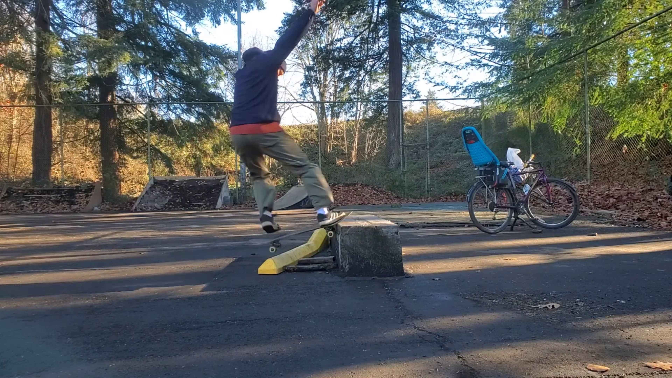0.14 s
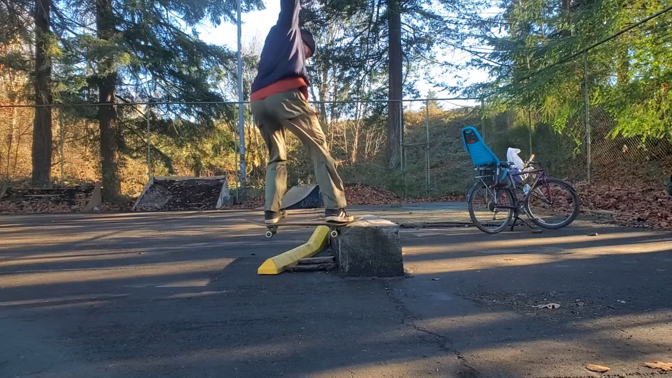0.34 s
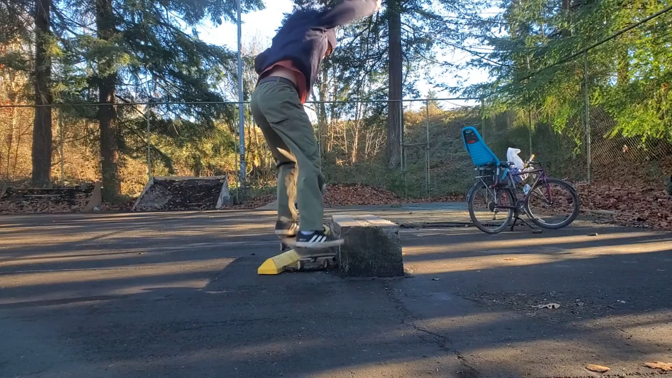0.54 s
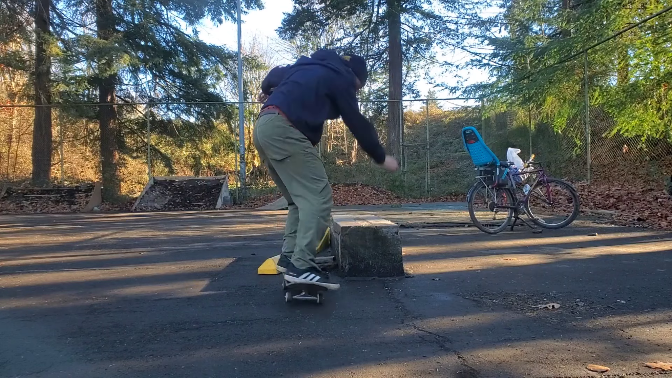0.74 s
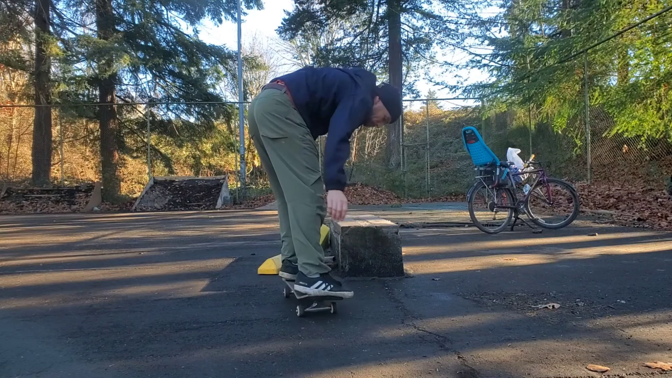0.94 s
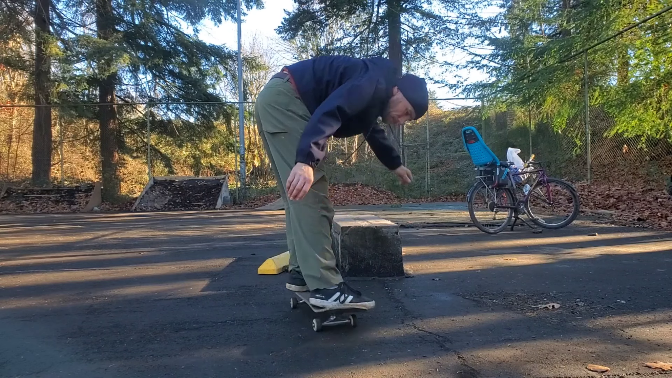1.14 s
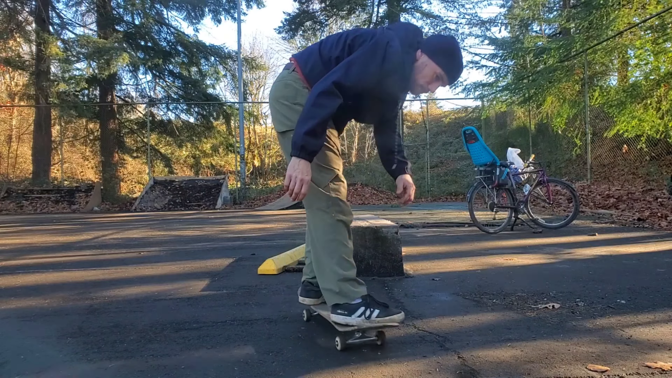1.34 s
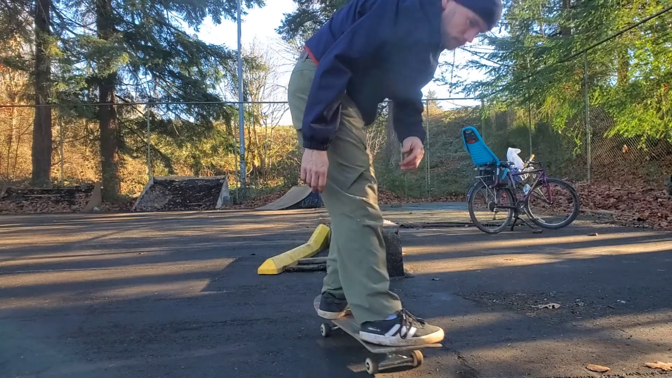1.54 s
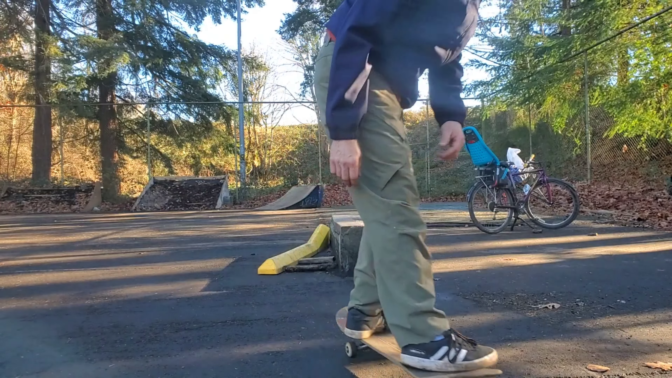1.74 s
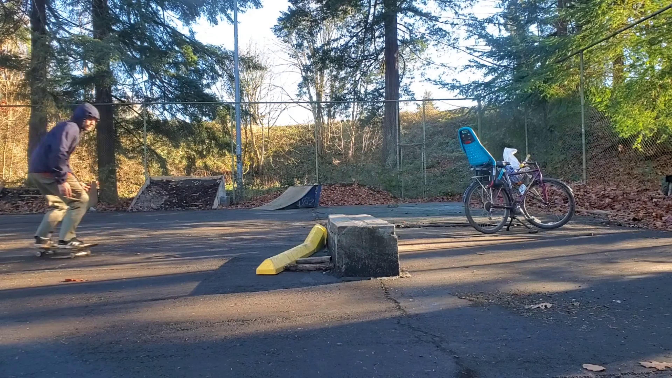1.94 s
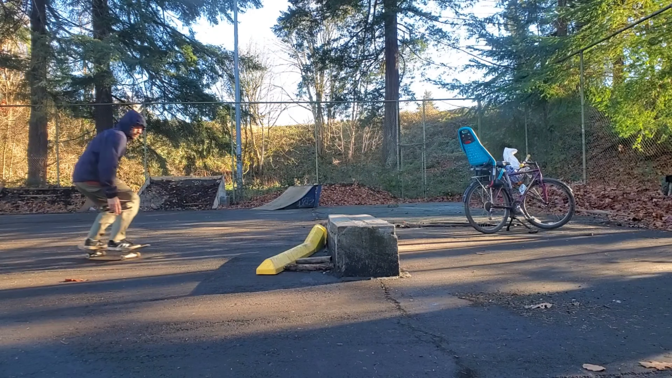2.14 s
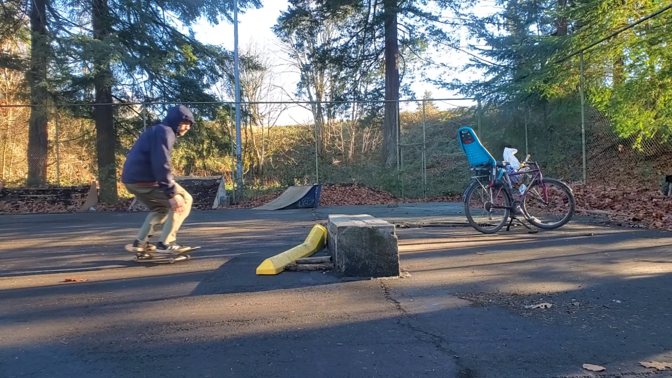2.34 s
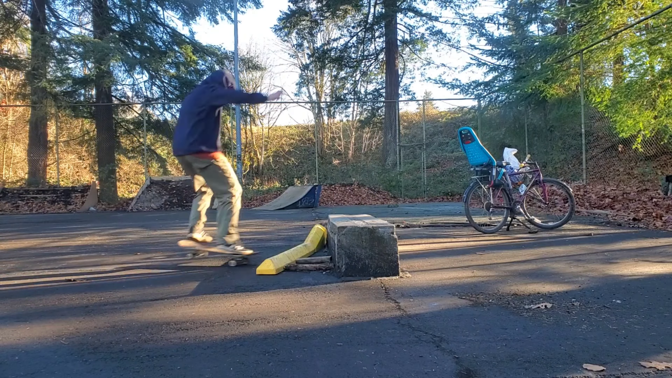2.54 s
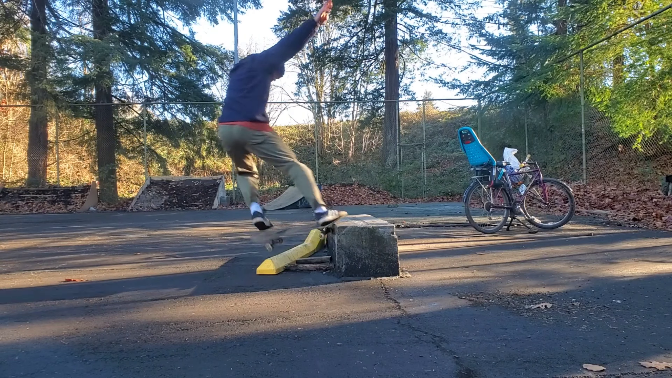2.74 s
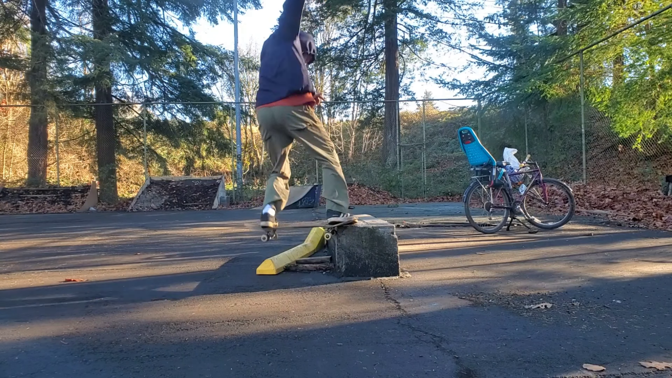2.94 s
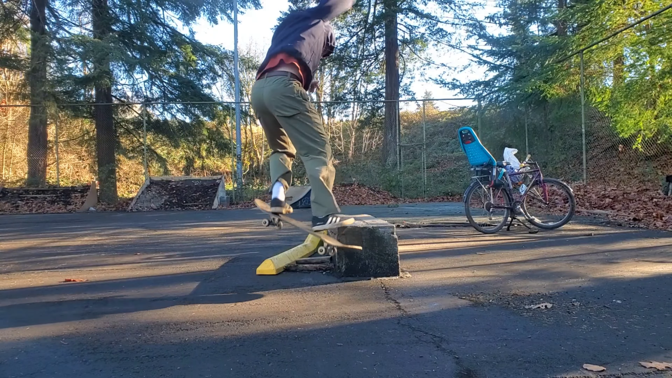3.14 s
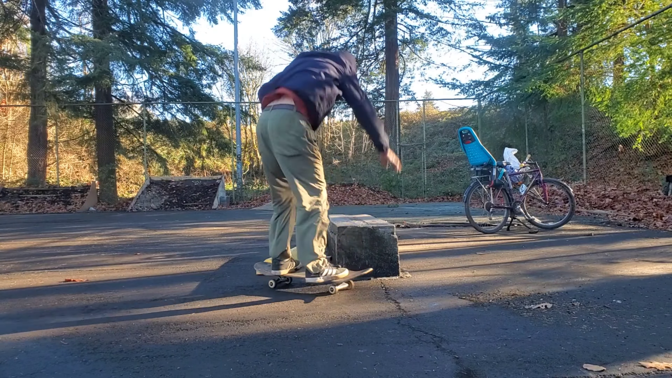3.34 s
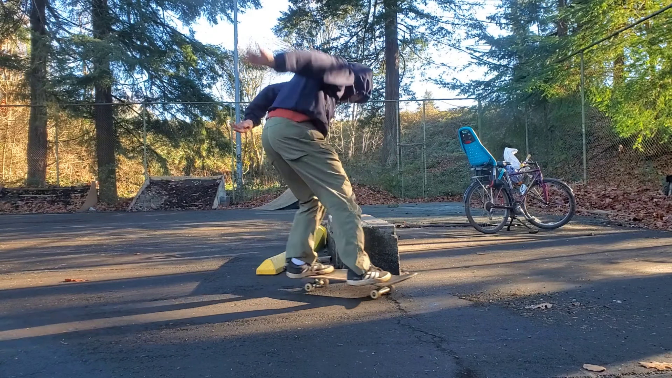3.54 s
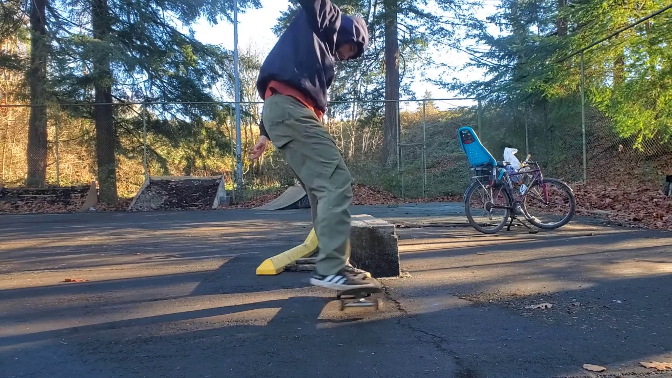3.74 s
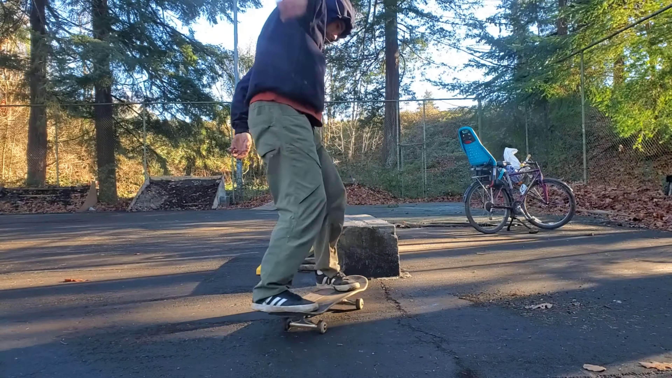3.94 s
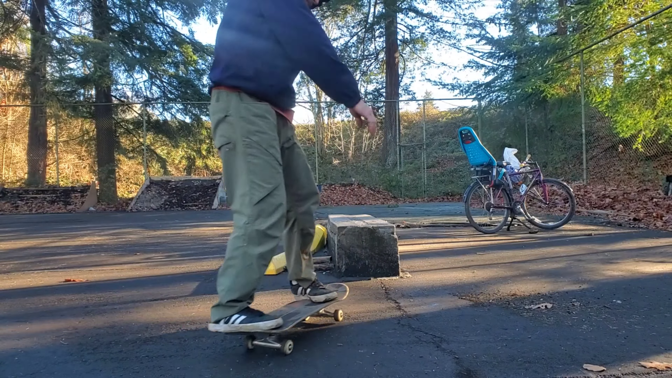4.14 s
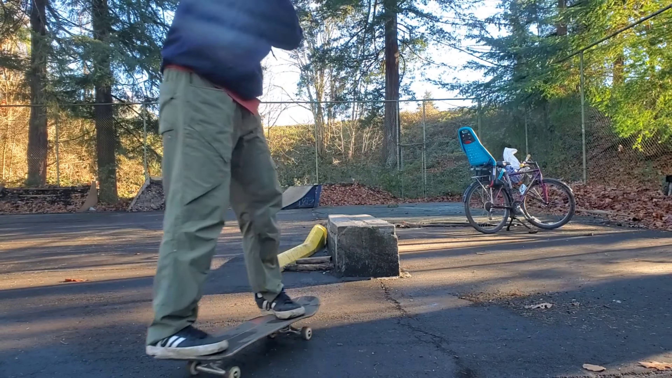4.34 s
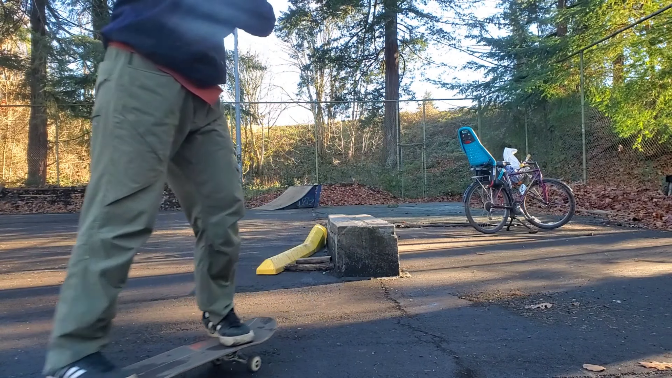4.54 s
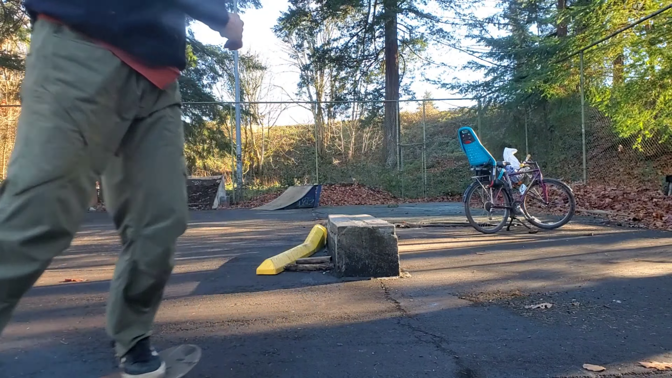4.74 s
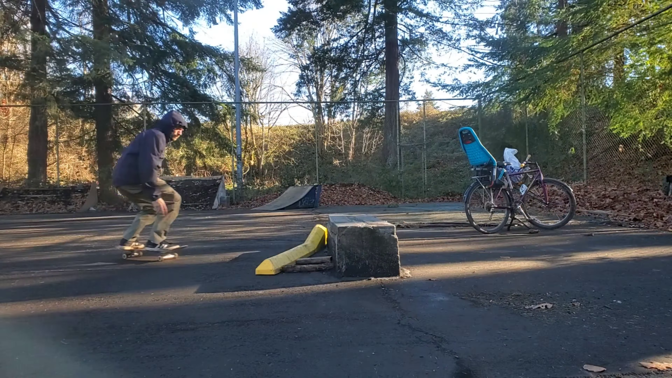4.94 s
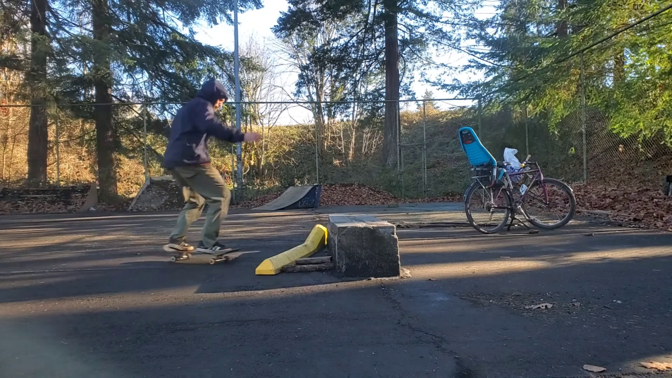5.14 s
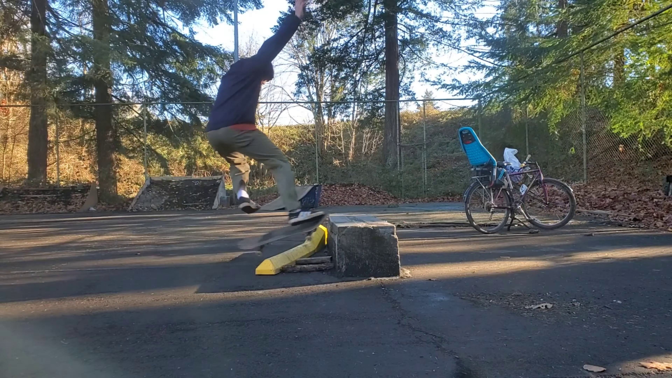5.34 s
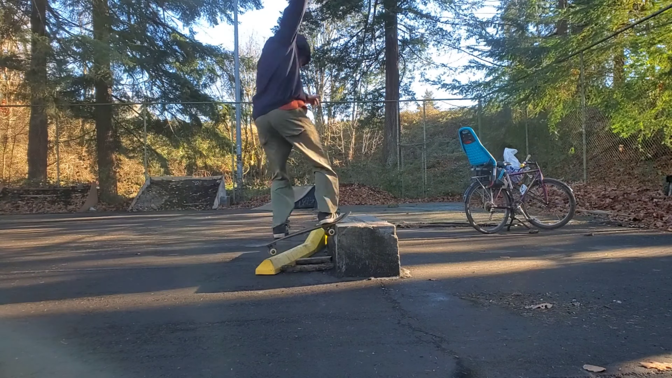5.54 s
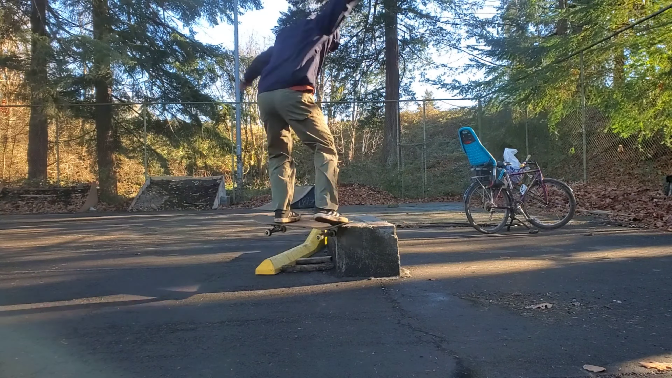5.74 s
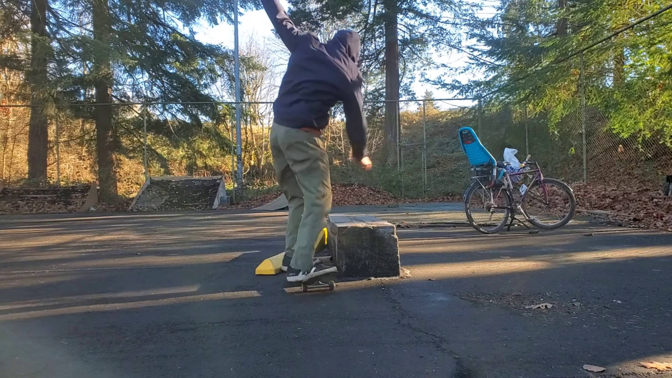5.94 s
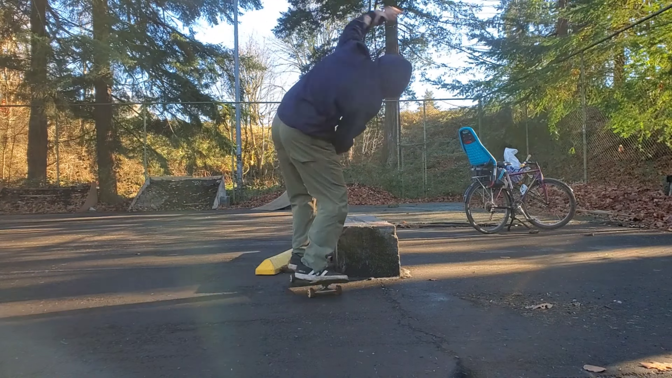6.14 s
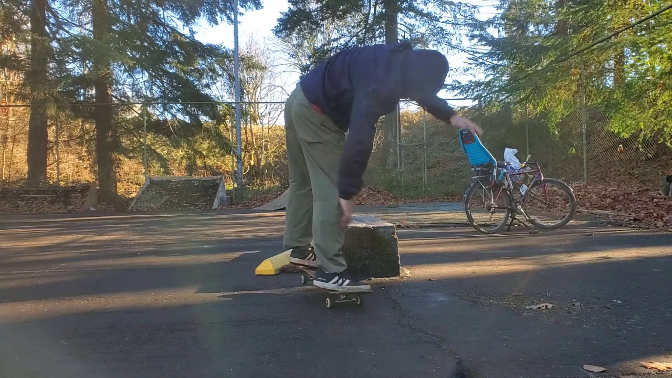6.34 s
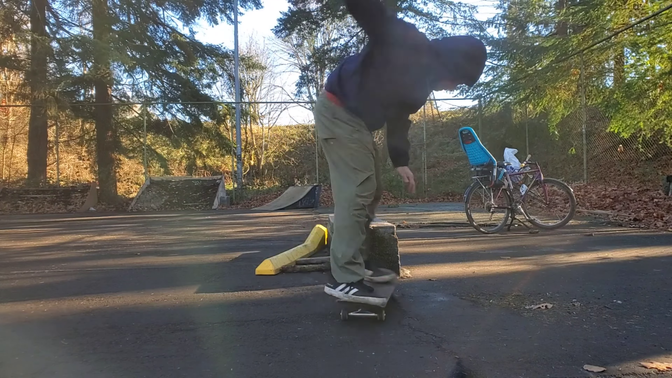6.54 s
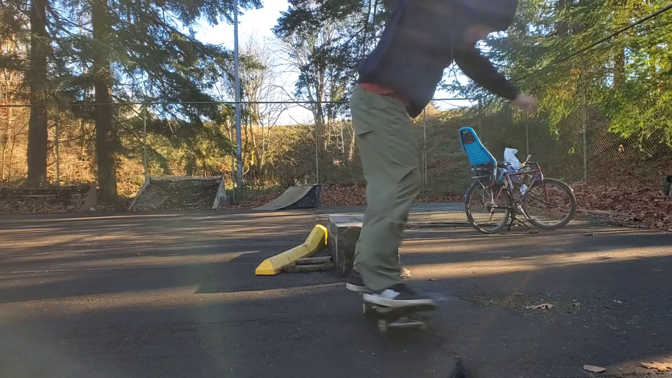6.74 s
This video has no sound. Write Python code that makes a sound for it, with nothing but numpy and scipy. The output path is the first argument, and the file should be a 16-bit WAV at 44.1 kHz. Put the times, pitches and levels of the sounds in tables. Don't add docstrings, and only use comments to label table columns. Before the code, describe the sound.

A stereo microphone stands in the open on rough asphalt, with low, uneven wind buffeting it and faint tree hiss. At 0 s a skateboard is already rattling into a concrete ledge: hard clacks and scrapes until 0.5 s, a brief hush, then a clattering landing at 0.75 s. It rolls on with grainy rumble, grit ticks and a sharp knock near 1.9 s. At 2 s the sound cuts to a louder rolling approach; dense cracks and scraping come at 2.6-3.1 s, a landing slap at 3.4 s, another clack at 3.9 s, then close gritty rolling with a thin bearing whine around 4.2-4.7 s. At 5 s another cut: strong rumble, scuffs and sharp knocks at 5.2-5.6 s, a short hop, a heavy landing at 6 s, quiet rolling, and a last double clack at 6.65 s before rolling out.

```python
import sys
import numpy as np
from scipy import signal
from scipy.fft import rfft, irfft
from scipy.io import wavfile
from scipy.ndimage import uniform_filter1d, map_coordinates

SR = 44100
rng = np.random.default_rng(int(sys.argv[2]) if len(sys.argv) > 2 else 0)


def boost(x):
    u = np.asarray(x, float) / 20
    return 10 ** u


def unload_audio(sound):
    columns = np.transpose(np.atleast_2d(sound))
    steps = np.round(np.clip(columns, -1, 1) * 32767)
    wavfile.write(sys.argv[1], SR, steps.astype(np.int16))


N = 303408


def rms_one(x):
    return x / np.sqrt(np.mean(x ** 2) + 1e-20)


def peak_one(rows):
    return rows / np.max(np.abs(rows), axis=-1, keepdims=True)


def in_time(rows):
    s, *columns = np.transpose(rows)
    return [np.interp(np.arange(N) / SR, s, c) for c in columns]


def together(*db):
    return 10 * np.log10(sum(boost(d) ** 2 for d in db))


def low_pass(x, order, hz):
    return signal.sosfilt(signal.butter(order, hz, fs=SR, output="sos"), x)


def colour(x, spectrum):
    hz, db = np.transpose(spectrum)
    grid = np.maximum(np.fft.rfftfreq(x.shape[-1], 1 / SR), 1)
    gain_db = np.interp(np.log(grid), np.log(hz), db, left=-90, right=-90)
    return irfft(rfft(x) * boost(gain_db), x.shape[-1])


def drift(rate):
    hop, warm_up = 40, 2000
    r = np.exp(-2 * np.pi * hop * rate / SR)
    noise = rng.standard_normal(N // hop + warm_up + 2)
    slow = signal.lfilter([1], [1, -2 * r, r * r], noise)[warm_up:]
    return np.interp(np.arange(N) / hop, np.arange(len(slow)), rms_one(slow))


def grains(shape, per_s, spread_db):
    sizes = boost(spread_db * np.minimum(rng.exponential(1, shape), 4))
    sizes = sizes * rng.choice([-1, 1], shape)
    return sizes * (rng.random(shape) < per_s / SR)


def port_noise(*shape):
    mid, side = rng.standard_normal((2, *shape))
    alike = 0.2
    ports = [np.sqrt(1 + alike) * mid + sign * np.sqrt(1 - alike) * side for sign in (1, -1)]
    return np.stack(ports, axis=-2)


def ring(clicks, modes, scatter_db, tilt_db=0):
    luck = rng.standard_normal((len(clicks), len(modes)))
    out = 0
    for k, (hz, level_db, t60) in enumerate(modes):
        r, w = boost(-60 / (t60 * SR)), 2 * np.pi * hz / SR
        sine = signal.lfilter([0, np.sin(w)], [1, -2 * r * np.cos(w), r * r], clicks + 1e-18)
        mode_db = level_db + scatter_db * luck[:, [k]] + tilt_db * np.log2(hz / modes[0][0])
        out = out + (-1) ** k * boost(mode_db) * sine
    return out


def add(track, times, rows):
    for s, row in zip(times, rows):
        at = round(s * SR)
        track[..., at:at + row.shape[-1]] += row[..., :N - at]


# t/s, deck rumble level/dB, truck looseness re rumble/dB
WHEELS = [
    [(0.0, -31.5, 0.5), (0.3, -41, -4.5), (0.55, -47.5, 0.5), (0.9, -45, -0.5), (1.37, -39.5, -13.5),
     (1.63, -43, -12), (2.0, -41, -14)],
    [(2.002, -30.5, -6.5), (2.6, -31.5, -12.5), (2.87, -39.5, -10), (3.14, -49, -14), (3.86, -42.5, -1.5),
     (4.02, -49.5, -7), (4.5, -41, -9), (4.82, -36, -17.5), (5.0, -50, 1)],
    [(5.003, -28.5, -9), (5.29, -34, -4), (5.6, -43, -6.5), (6.5, -52, -10), (6.61, -39.5, -9),
     (6.78, -46, -1.5), (6.88, -46, -14)],
]
# lift t/s, landing t/s
FLIGHTS = [
    (0.56, 0.73),
    (3.14, 3.3),
    (5.87, 5.985),
]
# start t/s, length/s, scrape level/dB
GRINDS = [(0.0, 0.035, -37), (0.091, 0.12, -37.5), (0.227, 0.098, -39), (0.33, 0.12, -49.5),
          (0.45, 0.089, -46), (2.0, 0.11, -44), (2.712, 0.065, -35), (2.87, 0.26, -45.5), (3.5, 0.09, -55),
          (4.28, 0.39, -53), (4.7, 0.18, -54), (4.942, 0.042, -50), (5.243, 0.047, -42),
          (5.34, 0.12, -41.5), (5.497, 0.075, -46), (5.683, 0.16, -49.5), (6.758, 0.037, -53),
          (3.8, 0.11, -60), (6.57, 0.055, -58.5), (6.648, 0.03, -49)]


def effort():
    t = np.arange(N) / SR
    rumble_db, loose_db = in_time(np.concatenate(WHEELS))
    fade_db_per_s, attack_s, grind_fade_db_per_s = 83, 0.023, 280
    hush_db = sum(fade_db_per_s * (t - lift) * ((t > lift) & (t < land)) for lift, land in FLIGHTS)
    step = t[::40]
    levels = []
    for s, length, db in GRINDS:
        rise_db = 20 * np.log10(np.clip((step - s) / attack_s, 1e-4, 1))
        levels.append(db + rise_db - grind_fade_db_per_s * np.maximum(step - s - length, 0))
    grind_db = np.interp(t, step, together(*levels))
    trucks_db = rumble_db + loose_db
    clumps_db = 1.8 * drift(14)
    grit_db = -59.5 + 0.18 * (trucks_db + 49)
    trucks_sum = together(trucks_db, grind_db - 3) + clumps_db
    scrape_sum = together(grit_db - 3.5, grind_db) + clumps_db
    grit_sum = together(grit_db, grind_db - 10)
    return rumble_db - hush_db, trucks_sum - hush_db, scrape_sum - hush_db, grit_sum - hush_db


# f/Hz, level/dB, T60/s
DECK = [(174, -3.5, 0.058), (262, 5.5, 0.02), (315.7, 1, 0.1), (366, 0, 0.021), (509.5, -2, 0.044)]
# f/Hz, level/dB, T60/s
AXLES = [(562.5, -3.5, 0.031), (739, 2.5, 0.031), (928, 2, 0.02), (1120, 2, 0.022)]
# f/Hz, level/dB, T60/s
EDGE = [(1384, -2, 0.031), (1598, -1, 0.023), (1969, 2.5, 0.014), (2325, -2.5, 0.021), (2637, -3, 0.014),
        (3006, -3.5, 0.014), (3380, -6, 0.0082)]
# f/Hz, level per Hz/dB
RUMBLE = [(71, -34), (120, -7), (201, -6.5), (399, -4.5), (603, -8), (756, -15), (1150, -38), (1400, -17.5),
          (1820, -64), (3080, -120)]
# f/Hz, level per Hz/dB
TRUCKS = [(500, -19), (800, 0.5), (1000, 2.5), (1250, -2), (1500, -3), (1900, -4.5), (2800, -20)]
# f/Hz, level per Hz/dB
SCRAPE = [(760, -45), (1300, -8.5), (2300, -4.5), (3040, -5), (3830, -10), (4040, -13), (6000, -21),
          (7800, -49), (13200, -120)]
# t/s, level/dB
WHINE = [(4.2, -80), (4.24, -48), (4.34, -50), (4.66, -54), (4.76, -62), (4.8, -80)]
# f/Hz, level per Hz/dB
BEARING = [(820, -40), (930, -2), (1010, 0), (1130, -40)]


def rolling(rumble_db, trucks_db, scrape_db, lumps):
    stones = grains((1, N), per_s=900, spread_db=-0.5)
    deck = rms_one(colour(stones[0], RUMBLE)) + .4 * rms_one(ring(stones, DECK, scatter_db=0)[0])
    sharp = grains(N, per_s=1500, spread_db=3.0)
    streaks = .4 * rms_one(ring(sharp[None], AXLES + EDGE[:4], scatter_db=0)[0])
    trucks = rms_one(colour(sharp + stones[0], TRUCKS)) + streaks
    patch_db = 2.5
    under = low_pass(trucks, 2, 1150)
    over = trucks - under
    trucks = under * boost(patch_db * lumps[::-1]) + over * boost(patch_db * np.roll(lumps, N // 3))
    upper = boost(trucks_db) * rms_one(trucks)
    upper = upper + boost(scrape_db) * rms_one(colour(sharp, SCRAPE))
    upper = upper + boost(*in_time(WHINE)) * rms_one(colour(sharp, BEARING))
    return boost(1.5 * lumps) * (boost(rumble_db) * rms_one(deck) + upper)


# f/Hz, level per Hz/dB
GRIT = [(1760, -35), (3000, -3), (3880, 4), (6440, 9), (7800, 2.5), (9460, 7), (11400, 8), (15400, 6.5),
        (16500, -20)]


def grit(grit_db, lumps):
    crunch = signal.lfilter([1], [1, -.988], np.abs(grains(N, per_s=70, spread_db=2.5)))
    hiss = colour(port_noise(N) * (1 + 1.34 * crunch), GRIT)
    return boost(grit_db - 1 + 0.59 * lumps) * rms_one(hiss)


# t/s, level/dB
GUSTS = [
    [(0.0, -27.5), (0.31, -33), (0.342, -25.5), (0.554, -38.5), (0.592, -33), (1.674, -38.5), (1.706, -37),
     (1.95, -30), (1.99, -33.5)],
    [(2.0, -46), (3.1, -43), (3.26, -53), (3.44, -37.5), (3.55, -49), (4.3, -39), (4.46, -43), (4.92, -43),
     (4.99, -34)],
    [(5.0, -37.5), (5.302, -31.5), (5.402, -55), (5.502, -33), (5.848, -47.5), (6.004, -37), (6.398, -46),
     (6.424, -33), (6.88, -35)],
]
# f/Hz, level per Hz/dB
WIND = [(12, -49), (20, -49), (43, -0.5), (76, 3.5), (92, -0.5), (140, -4), (331, -18.5), (400, -46),
        (520, -41), (880, -120)]
# t/s, level/dB
DEEP_WIND = [(0, 2), (1.4, 1), (1.99, 5), (2.0, 4), (2.4, 0), (2.6, -6), (4.99, -3), (5.0, -2), (6.88, -5)]


def wind():
    wind_db, = in_time(np.concatenate(GUSTS))
    gusts = colour(rng.standard_normal((3, N)), WIND)
    ports = [(gusts[k] + .45 * gusts[2]) * boost(3.5 * drift(9)) for k in range(2)]
    deep = low_pass(ports, 2, 60)
    return boost(wind_db + 5.5) * rms_one(ports + (boost(*in_time(DEEP_WIND)) - 1) * deep)


def air():
    spectrum = [(100, -14), (1000, 3.5), (4000, -17), (16000, -52)]      # f/Hz, level per Hz/dB
    return boost(-52.5) * rms_one(colour(rng.standard_normal((2, N)), spectrum))


def blows(table, first, rise_s, abrupt, per_s, soft_hz):
    s, edge_db, plank_db, axle_db, treble_db, length = np.transpose(table)[:, :, None]
    t = np.arange(4608) / SR
    length = np.clip(length, .001, .04)
    pressure = np.exp(-(t / length) ** abrupt) * np.minimum(t / rise_s, 1)
    chatter = grains((len(s), len(t)), per_s, spread_db=4.0) * pressure + first * (t == t[30])
    force = low_pass(chatter, 1, soft_hz)
    soles = np.exp(-np.maximum(t - 1.06 * length, 0) / 0.011)
    tilt_db = -.3 * (plank_db + 12) - .3 * (axle_db + 7)
    edge = peak_one(ring(force, EDGE, scatter_db=2.5, tilt_db=tilt_db)) * soles
    axles = peak_one(ring(force, AXLES, scatter_db=3.0)) * soles
    plank = peak_one(ring(force, DECK, scatter_db=2.0)) * soles
    shake = uniform_filter1d(np.abs(chatter), size=40)
    crack = 0.38 * first * np.exp(-t / 0.00099)
    burst = 0.54 * pressure + 2.8 * shake + crack
    spit = peak_one(port_noise(len(s), len(t)) * burst[:, None])
    body, treble = np.zeros(N), np.zeros((2, N))
    mix = edge + boost(axle_db + 2.5) * axles + boost(plank_db + 5.0) * plank
    add(body, s[:, 0] - .001, boost(edge_db) * mix)
    add(treble, s[:, 0] - .0003, boost(edge_db + treble_db + 18)[:, None] * spit)
    return body, treble


def contacts(s, edge_db, plank_db, treble_db, length, axle_db):
    axle_db = axle_db + 0.32 * (plank_db + 10)
    return np.transpose(np.broadcast_arrays(s, edge_db, plank_db, axle_db, treble_db, length))


# t/s, edge peak level/dB, plank re edge/dB, treble re edge/dB, length/s
SCUFFS = [(0.0034, -14.5, -2, -30, 0.022), (0.041, -29, -11, -22, 0.01), (0.508, -19, -17, -15.5, 0.024),
          (0.812, -28.5, 0.5, -17, 0.03), (2.59, -22.5, 1.5, -26, 0.049), (2.6264, -19, -3.5, -23, 0.034),
          (2.6406, -16, -9, -24, 0.041), (3.538, -31, -6.5, -11.5, 0.034), (3.8284, -29.5, -8, -22, 0.038),
          (3.8662, -28, -18, -28, 0.041), (5.226, -19.5, 1, -28, 0.04), (5.257, -14.5, -2.5, -24, 0.03),
          (5.2847, -18.5, -11, -28, 0.025), (5.822, -13.5, -16.5, -17.5, 0.033),
          (5.841, -29.5, -2, -11, 0.016), (2.832, -11, -20, -17, 0.015), (3.024, -17, -30, -15, 0.019),
          (5.302, -26, -14, -20, 0.014)]


def scuffs():
    rows = contacts(*np.transpose(SCUFFS), axle_db=-5.0)
    return blows(rows, first=0, rise_s=0.021, abrupt=2.7, per_s=2500, soft_hz=3500)


# t/s, edge peak level/dB, plank re edge/dB, treble re edge/dB, axles re edge/dB
SLAMS = [(0.0126, -21, 0, -22, -3), (0.0236, -11.5, -16, -23, -3), (0.2216, -6, -11, -12.5, -5),
         (0.2325, -7.5, -19, -15, -5), (0.2882, -16, -9.5, -14.5, -4.5), (0.7417, -8.5, -8.5, -18.5, -3.5),
         (0.7512, -19, -3.5, -14, -3), (2.7363, -12, -13, -21, -2), (2.8461, -3, -23, -15.5, -6),
         (3.372, -17.5, -14, -18.5, -8), (3.0601, -21.5, -18, -17.5, -9), (3.3548, -15, -12.5, -16.5, -6),
         (3.3884, -5.5, -7, -18.5, -5), (3.4009, -10.5, -8, -17, -2), (3.9412, -16, -12, -15.5, -5),
         (5.476, -6, -12, -12, -8), (5.4859, -9, -7, -15, -4.5), (5.9845, -10, -7, -12.5, -3),
         (6.0037, -5.5, -8.5, -19.5, -3.5), (6.641, -15, -10, -22, -10), (6.6529, -14, -9, -18, -6)]


def slams():
    s, edge_db, plank_db, treble_db, axle_db = np.transpose(SLAMS)
    length = 0.016 - 0.0004 * (edge_db + 8)
    rows = np.transpose([s, edge_db, plank_db, axle_db, treble_db, length])
    return blows(rows, first=4.0, rise_s=.0006, abrupt=3.5, per_s=1100, soft_hz=2500)


# t/s, edge peak level/dB, plank re edge/dB, treble re edge/dB, length/s
KNOCKS = [(0.0864, -5, -13, -19.5, 0.008), (0.7684, -9.5, -7.5, -18.5, 0.0095),
          (1.8929, -16, -13, -20, 0.003), (2.699, -3, -20, -20, 0.0097), (2.819, -4, -15, -12.5, 0.011),
          (2.8655, -5.5, -20, -20.5, 0.011), (2.9178, -22, -28, -17, 0.007), (3.4187, -11, -8, -13, 0.0031),
          (3.6489, -26.5, -11, -19, 0.022), (3.9132, -12.5, -17, -9.5, 0.0058),
          (4.28, -22.5, -8, -19, 0.007), (4.3024, -25.5, -8, -22, 0.016), (4.858, -22.5, -19, -17, 0.009),
          (4.9307, -18, -15, -26, 0.0067), (4.9756, -25, -11, -11.5, 0.007),
          (5.3369, -3, -19.5, -22.5, 0.01), (5.4994, -18.5, -3.5, -9, 0.005),
          (5.5424, -6.5, -22.5, -21, 0.005), (5.5643, -13.5, -18, -14.5, 0.0086),
          (5.6032, -21, -13.5, -14, 0.006), (5.7157, -26, -4.5, -11.5, 0.0047),
          (6.0278, -10.5, -7, -22, 0.0076), (3.4135, -22, 6, -22, 0.0035), (3.8484, -25, -11, -16, 0.0037),
          (2.796, -22, -18, -17, 0.0054)]
# t/s, edge peak level/dB, plank re edge/dB
TAPS = [(0.9083, -27.5, -11), (0.9898, -31, -3), (1.3455, -39, 8.5), (1.7298, -32, 9), (1.872, -28.5, -13),
        (2.0023, -30, -11), (2.1156, -21.5, -5), (3.277, -42, -8), (3.4674, -42, 15.5), (3.5922, -36, 5),
        (4.0353, -60, 18.5), (4.111, -38, -10), (4.2381, -33, -6), (4.4008, -26.5, -26), (4.5893, -25, -24),
        (4.648, -26, -9), (4.8817, -29, -5), (5.3094, -39, -7), (5.5782, -26, -3), (5.7473, -27.5, -28),
        (5.7965, -29.5, -1.5), (6.0845, -28.5, -6), (6.784, -23.5, -8.5)]


def knocks():
    hard = contacts(*np.transpose(KNOCKS), axle_db=-9)
    light = contacts(*np.transpose(TAPS), treble_db=-18.5, length=0.005, axle_db=-8)
    rows = np.r_[hard, light]
    return blows(rows, first=5.1, rise_s=0.0011, abrupt=0.71, per_s=1800, soft_hz=9000)


# f/Hz, level per Hz/dB
BRIGHT = [(1760, -22), (3000, 2.5), (5120, -2), (5620, -0.5), (8090, -12), (8930, -9), (14800, -12),
          (15800, -24), (16500, -50)]


def impacts():
    bodies, trebles = zip(scuffs(), slams(), knocks())
    return sum(bodies), colour(sum(trebles), BRIGHT)


def pings(table, cycles):
    s, peak_db, hz = np.transpose(table)[:, :, None]
    turns = hz * np.arange(4096) / SR
    modes = [(1, 1), (.81, -.55), (1.23, .35)]
    rows = sum(share * np.sin(2 * np.pi * ratio * turns) for ratio, share in modes)
    rows = rows * np.minimum(turns, 1) * boost(-60 * turns / cycles)
    track = np.zeros(N)
    add(track, s[:, 0], boost(peak_db) * peak_one(rows))
    return track


# t/s, peak level/dB, f/Hz
STRIKES = [(3.9145, -16, 1080), (6.029, -13, 900), (5.986, -15, 2800), (3.358, -22, 3000),
           (0.0872, -9, 3200), (0.121, -25, 3300), (0.2265, -9, 750), (0.2305, -12, 2300),
           (0.7432, -10, 1650), (0.7698, -13, 1600), (1.8935, -22, 2700), (2.7, -12, 3000),
           (2.8485, -10, 2800), (2.8675, -10, 2300), (3.035, -22, 2100), (3.054, -26, 2400),
           (3.069, -24, 2400), (3.3895, -10, 1370), (3.4035, -9, 520), (3.914, -18, 6500),
           (5.338, -9, 2700), (5.479, -12, 2000), (6.005, -11, 1700), (6.009, -9, 1150), (6.6415, -8, 1900),
           (6.654, -10, 1900), (6.658, -14, 1300)]


def strikes():
    return pings(STRIKES, cycles=22.0)


# t/s, peak level/dB, f/Hz
THUMPS = [(0.15, -21, 70), (0.893, -25, 89), (1.732, -27, 250), (4.036, -20, 190), (6.643, -16, 280),
          (3.357, -22, 280), (2.701, -16, 560), (4.95, -30, 500), (3.848, -29, 94), (4.291, -24, 94),
          (4.384, -31, 73), (5.81, -32, 75), (6.236, -33, 62), (6.305, -32, 81), (0.822, -24, 330),
          (1.35, -28, 330)]


def thumps():
    return pings(THUMPS, cycles=7.0)


def snapping(table, spectrum, gain_db):
    s, peak_db = np.transpose(table)
    snap = port_noise(len(s), 768) * np.exp(-np.arange(768) / SR / 0.0013)
    track = np.zeros((2, N))
    add(track, s, boost(peak_db + gain_db)[:, None, None] * peak_one(snap))
    return colour(track, spectrum)


# t/s, peak level/dB
TICKS = [(0.274, -32), (0.3034, -39), (0.8038, -37), (0.825, -39.5), (1.063, -49), (1.1543, -49),
         (1.172, -45), (1.2333, -51), (1.306, -36), (1.872, -39.5), (1.789, -52), (1.8116, -48),
         (1.8344, -51), (1.946, -41.5), (1.9834, -46), (3.698, -48), (3.817, -48.5), (4.132, -46.5),
         (4.1804, -51.5), (4.213, -47), (4.263, -45), (4.6297, -44), (4.7294, -40.5), (4.7643, -42),
         (5.5309, -37), (6.214, -53), (6.2722, -49), (6.4677, -53), (6.576, -52), (6.714, -44),
         (1.2837, -55), (4.1647, -55), (4.6052, -54), (4.7135, -54), (5.9995, -33), (6.5577, -56),
         (0.8142, -42), (3.633, -53)]


def ticks():
    return snapping(TICKS, GRIT, gain_db=10.5)


# t/s, peak level/dB
BUMPS = [(0.333, -18), (0.606, -17), (1.069, -21), (1.702, -21), (1.835, -22), (1.903, -23), (2.612, -25),
         (3.383, -23), (4.029, -23.5), (4.097, -23), (4.962, -20.5), (5.163, -20), (5.258, -13),
         (5.474, -19.5), (6.004, -21), (6.43, -26), (0.388, -20), (0.682, -25), (3.465, -29), (4.232, -25),
         (4.152, -28), (6.53, -24), (6.725, -25)]


def bumps():
    s, peak_db = np.transpose(BUMPS)
    push = np.hanning(160) * np.ones((len(s), 1))
    ground = [(88.0, 0.21, 0.085), (135, -2.2, 0.054)]      # f/Hz, level/dB, T60/s
    rows = ring(np.pad(push, ((0, 0), (0, 4000))), ground, scatter_db=5.0)
    track = np.zeros(N)
    add(track, s, boost(peak_db - 1.0)[:, None] * peak_one(rows))
    return track


# t/s, peak level/dB, f/Hz
NICKS = [(0.864, -34, 1470), (1.031, -33, 1520), (1.067, -35, 1180), (1.133, -35, 1340), (1.156, -39, 1420),
         (1.194, -37, 988), (1.21, -38, 2000), (1.305, -35, 1180), (1.335, -37, 1420), (1.533, -40, 1440),
         (1.712, -38, 1060), (1.811, -38, 1070), (1.887, -32, 2000), (1.948, -34, 1900), (2.038, -28, 1300),
         (2.085, -28, 1750), (2.203, -32, 832), (2.533, -31, 821), (3.67, -33, 2000), (3.796, -36, 845),
         (4.024, -42, 1200), (4.1125, -37, 1660), (4.1369, -37, 1450), (4.1943, -33, 1470),
         (4.2492, -32, 1900), (4.3175, -26, 1900), (4.3554, -34, 1900), (4.403, -29, 2250),
         (4.4552, -31, 2400), (4.4861, -32, 2500), (4.514, -35, 2700), (4.5699, -32, 2140),
         (4.5884, -30, 2200), (4.6, -33, 2200), (4.6273, -35, 1400), (4.7296, -36, 2000),
         (4.8583, -31, 1550), (5.005, -33, 738), (5.036, -33, 1200), (5.128, -36, 900), (5.167, -35, 1300),
         (5.452, -30, 3700), (6.125, -34, 1600), (6.175, -39, 1230), (6.257, -39, 1940), (6.338, -39, 1490),
         (6.42, -42, 1400), (6.581, -37, 1300), (6.712, -35, 1700), (6.775, -30, 1500), (6.799, -34, 1600),
         (6.8745, -30, 1800), (3.87, -28, 800), (6.215, -38, 1300)]


def nicks():
    return pings(NICKS, cycles=24.0)


# t/s, peak level/dB
SNAPS = [(0.8849, -42), (0.9882, -42), (1.0276, -42), (1.1338, -40), (1.1874, -40), (1.2101, -43),
         (1.3314, -46), (1.3483, -50), (1.3483, -40), (1.4471, -46), (1.5559, -44), (1.6287, -38),
         (1.6482, -40), (1.6965, -39), (1.733, -34), (2.0014, -36), (3.5982, -43), (3.6152, -43),
         (3.7818, -42), (3.8487, -36), (3.9734, -36), (4.0028, -46), (4.0223, -39), (4.0477, -43),
         (4.1066, -36), (4.2892, -37), (4.3001, -31), (4.4413, -41), (4.5022, -42), (4.6623, -42),
         (4.6743, -38), (4.6957, -42), (4.9657, -29.5), (6.0741, -39), (6.1629, -44), (6.351, -45),
         (6.4053, -43), (6.4223, -45), (6.4413, -43), (6.5096, -45), (6.6144, -43), (6.6533, -19.5),
         (6.6732, -26), (6.7366, -39), (6.7815, -36), (6.7994, -39)]
# f/Hz, level per Hz/dB
FINE = [(3000, -40), (5500, -14), (7000, -3), (8200, -8), (9500, 1), (15400, 1), (16500, -25)]


def snaps():
    return snapping(SNAPS, FINE, gain_db=6.5)


# t/s, lead of left port/samples, left re right level/dB
PLACE = [(0, 3.5, 3), (.7, -1.5, 5.5), (1.99, 5, 2.5), (2.0, 10, 4), (2.55, 7.5, 2), (2.75, 1.5, 2.5),
         (4.0, 0, 2), (4.7, 6, 3.5), (5.0, 13.5, 5.5), (5.35, 2, 2), (6.88, -0.5, 2)]


def at_ports(board):
    lead, left_db = in_time(PLACE)
    late = map_coordinates(board, [np.arange(N) - lead], order=3, mode="nearest")
    pair = np.array([board, late])
    low = low_pass(pair, 1, 350)
    return low + (pair - low) * boost([left_db / 2, -left_db / 2])


def surroundings(x):
    t60_s, tail_db, cut_hz = 0.31, -18, 4200
    t = np.arange(SR // 2) / SR
    echoes = rng.standard_normal((2, len(t))) * boost(-60 * t / t60_s) * np.minimum(t / 0.0031, 1)
    dull = low_pass(echoes, 1, cut_hz)
    dull = dull / np.sqrt(np.sum(dull[0] ** 2))
    return boost(tail_db) * signal.fftconvolve(x[None], dull, axes=1)[:, :N]


def scene():
    rumble_db, trucks_db, scrape_db, grit_db = effort()
    lumps = drift(45)
    body, spit = impacts()
    board = rolling(rumble_db, trucks_db, scrape_db, lumps) + body
    board = board + strikes() + thumps() + bumps() + nicks()
    treble = grit(grit_db, lumps) + spit + ticks() + snaps()
    return at_ports(board) + treble + surroundings(board + treble[0]) + wind() + air()


def band_limit(x):
    return signal.sosfilt(signal.butter(12, 16670, fs=SR, output="sos"), x)


def record(dry):
    rounded = 1.6 * np.tanh(dry / 1.6)
    top_cut = signal.cheby2(4, 20, 17500, fs=SR, output="sos")
    return band_limit(signal.sosfilt(top_cut, rounded))


dry = scene()
out = record(dry)
unload_audio(out)
```